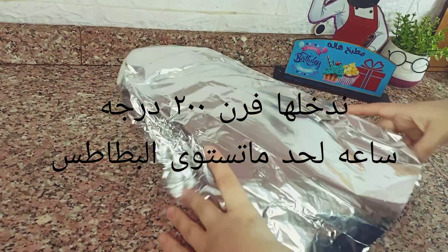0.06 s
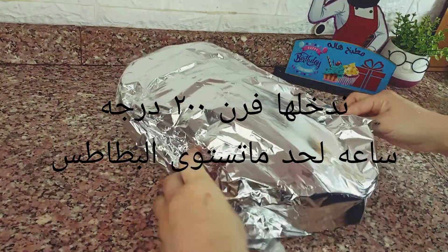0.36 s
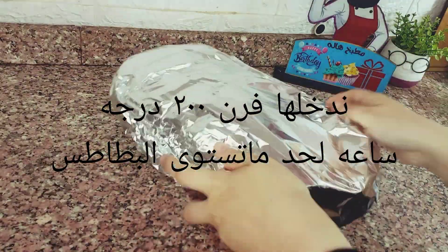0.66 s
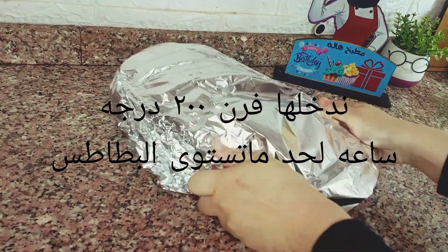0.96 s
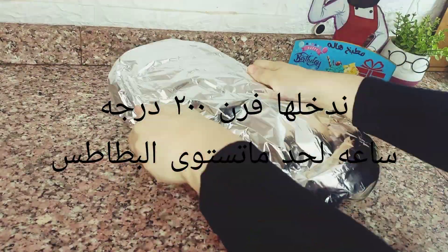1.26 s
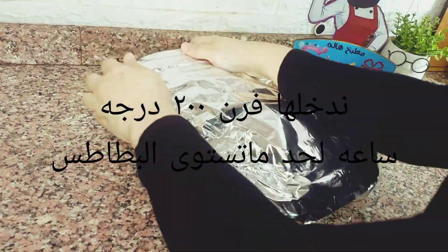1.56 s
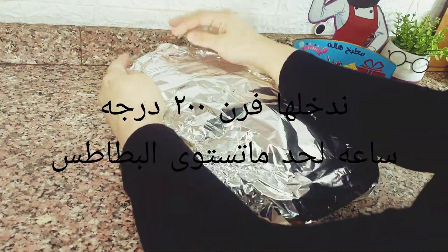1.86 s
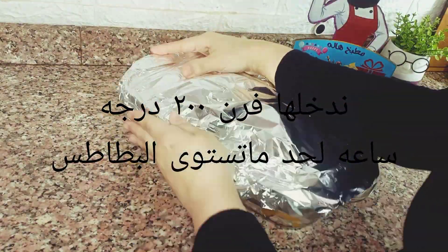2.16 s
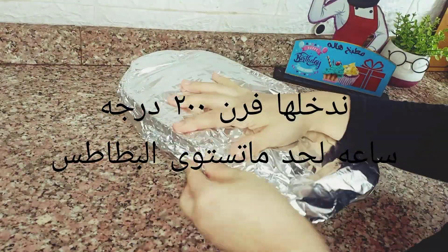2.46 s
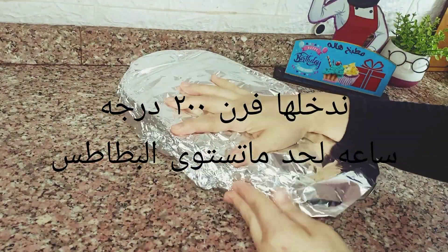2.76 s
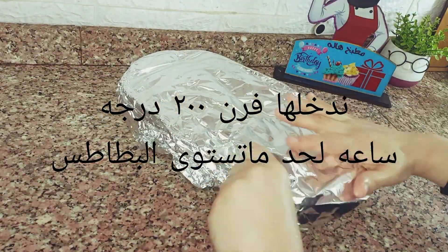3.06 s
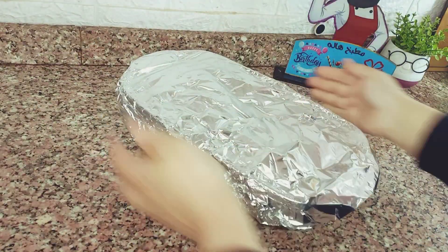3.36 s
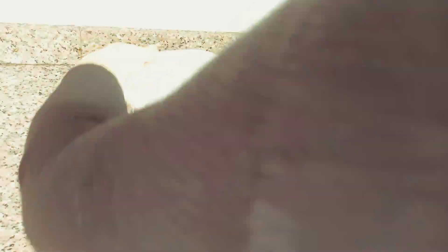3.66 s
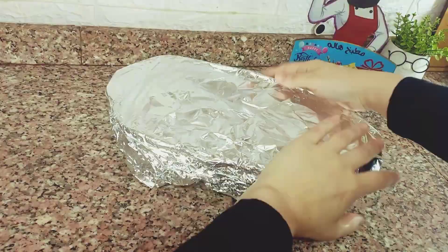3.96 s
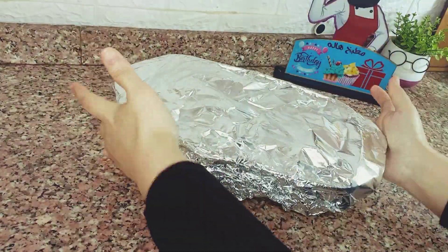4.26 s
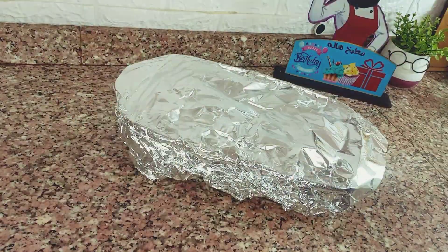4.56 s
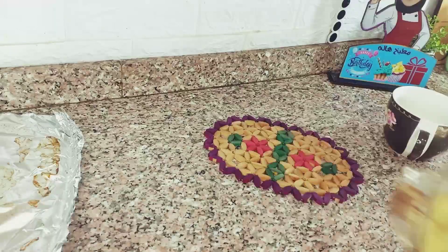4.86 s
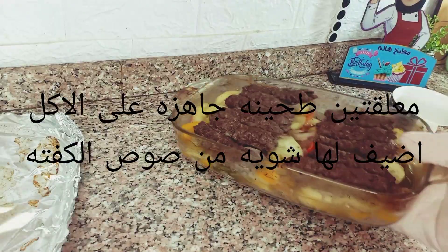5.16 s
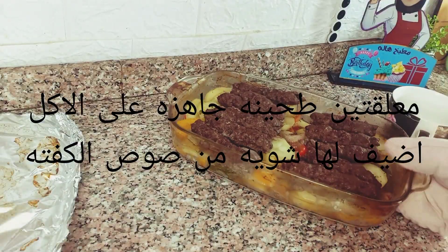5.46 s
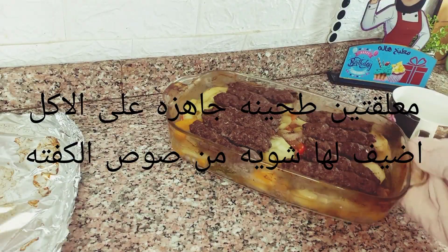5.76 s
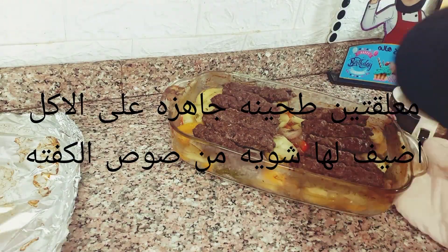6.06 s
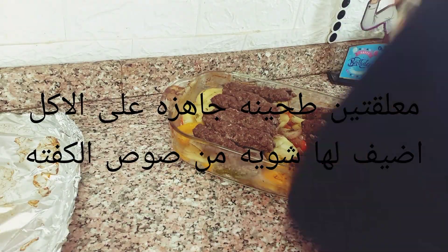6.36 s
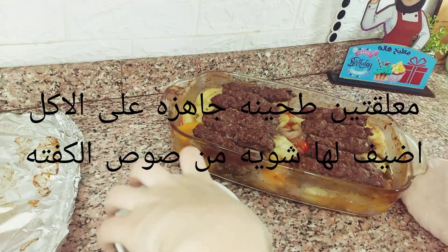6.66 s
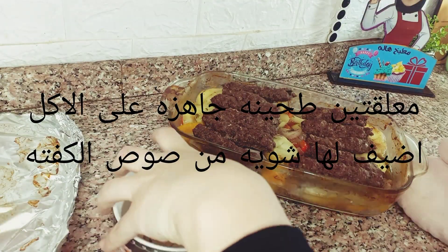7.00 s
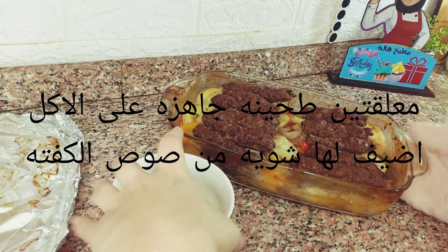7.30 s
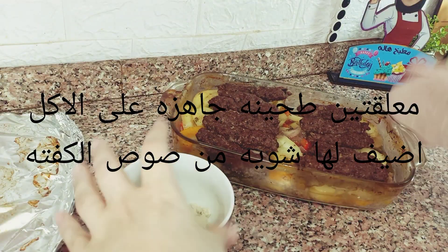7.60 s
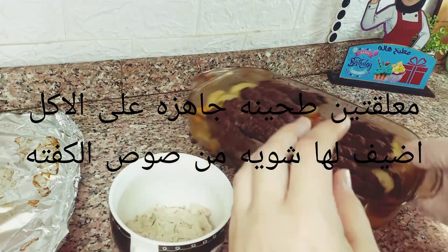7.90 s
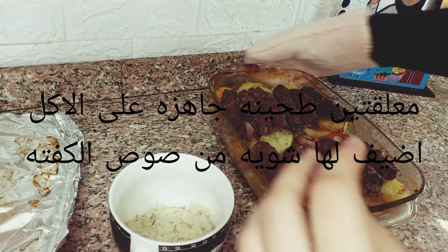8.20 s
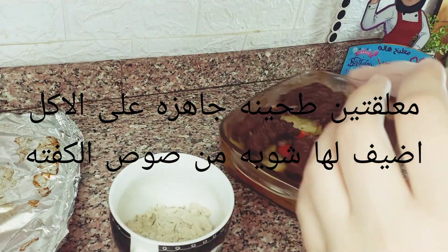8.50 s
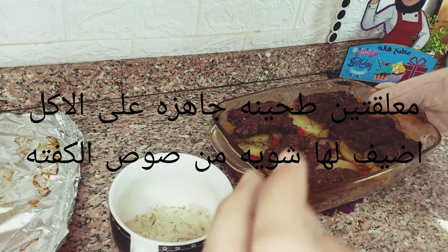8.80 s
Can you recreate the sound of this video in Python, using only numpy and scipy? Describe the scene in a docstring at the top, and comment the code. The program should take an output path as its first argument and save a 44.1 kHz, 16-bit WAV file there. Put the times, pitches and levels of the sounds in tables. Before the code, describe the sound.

Aluminium foil crinkles in short, bright squeezes as hands press it around a baking dish, with little snaps that grow sparser and fainter. After a brief silence, the glass dish lands on a stone counter with a dull knock and settles. A china bowl follows with one bright clack, light taps and faint scrapes. Everything sounds close, in a small, hard-walled kitchen with a quietly humming appliance.

```python
"""Aluminium foil crinkles in short squeezes as two hands press it round a glass baking dish.
Each crinkle is a crowd of tiny buckles that shiver through the sheet. After a brief silence the dish
knocks down on a stone counter and settles, then a china bowl is put beside it and nudged.
The small hard kitchen echoes, and an appliance, probably the fridge, hums behind it all."""
import sys
import numpy as np
from scipy import signal
from scipy.fft import rfft, irfft, next_fast_len
from scipy.io import wavfile
from scipy.ndimage import uniform_filter1d, minimum_filter1d, map_coordinates

SR = 44100
rng = np.random.default_rng(int(sys.argv[2]) if len(sys.argv) > 2 else 0)


def file_out(sig):
    """Save sig as 16-bit WAV at sys.argv[1]."""
    # one column per channel
    cols = np.atleast_2d(sig).T
    # limit, then scale
    lim = np.clip(cols, -1, 1)
    pcm = np.round(lim * 32767).astype(np.int16)
    wavfile.write(sys.argv[1], SR, pcm)


N = 389844


def crinkle(thinning_s=2.4, end_s=4.7, scatter_db=2.0, clump_db=2.1, flex_db=1.5, count=10000):
    """Tiny buckles come in clumps, ever sparser as the loose foil is used up."""
    times = -thinning_s * np.log(1 - rng.uniform(size=count) * (1 - np.exp(-end_s / thinning_s)))
    sizes = amp(scatter_db * np.minimum(rng.exponential(size=count), 3.5))
    sizes *= np.exp(times / thinning_s / 2)  # fewer buckles share the same work
    crackle = sheet(buckles(times, sizes) * amp(clump_db * wobble(110)))
    below = lambda hz, edge: 1 / (1 + (hz / edge) ** 12)
    band = lambda response: unit(filtered(crackle, response)) * np.sqrt(end_s * SR / N)
    # Small creases tick high, flat facets fill the middle, broad panels crackle low.
    creases = band(lambda hz: 1 - below(hz, 2830)) * pressure(body_share=0)
    facets = band(lambda hz: below(hz, 3070) - below(hz, 1150)) * pressure(body_share=0.76)
    panels = band(lambda hz: below(hz, 1500)) * pressure(body_share=1)
    panels *= amp(flex_db * wobble(24.97))
    return amp(-0.5) * creases + amp(-5.5) * facets + amp(-11.5) * panels


# The hands mould the foil to the dish. Each row: start in seconds, end in seconds, level in dB,
# body in dB (how much broad sheet moves, which adds low crackle).
HAND_GRIPS = [(0.03, 0.045, -38, -1.5), (0.074, 0.52, -30.5, -2), (0.541, 0.68, -40, 1.5),
              (0.7, 1.014, -32.5, -0.5), (1.045, 1.064, -33.5, -3.5), (1.167, 1.19, -47.5, 2),
              (1.187, 1.29, -35, 1.5), (1.483, 1.574, -35.5, -1), (1.574, 1.832, -34, 2.5),
              (1.83, 1.891, -41, 1), (1.946, 2.05, -36, 2.5), (2.066, 2.29, -39.5, -0.5),
              (2.375, 2.696, -39.5, -0.5), (2.716, 2.95, -45, -2), (3.023, 3.146, -37, -3.5),
              (3.262, 3.376, -42.5, 0), (3.526, 3.66, -40.5, -1), (3.697, 3.726, -52, 11.5),
              (4.018, 4.107, -46, -4), (4.22, 4.383, -57, 6)]
# A finger crushes a patch. Each row: loudest moment in seconds, length in seconds, level in dB,
# body in dB.
FINGER_CRUSHES = [(0.122, 0.18, -30.5, -4), (0.196, 0.12, -25.5, 0.5), (0.568, .03, -30, 0.5),
                  (0.706, 0.067, -25.5, -2), (0.97, 0.12, -26, -1), (1.097, 0.023, -32.5, 4.5),
                  (1.267, 0.072, -24.5, -3.5), (1.365, 0.052, -31.5, 3.5), (2.088, 0.053, -32.5, 2.5),
                  (2.195, 0.038, -25.5, 2.5), (2.238, 0.022, -24, -2.5), (2.421, 0.059, -30, 3),
                  (2.51, 0.11, -30.5, -1), (2.747, 0.043, -28.5, 1), (2.87, 0.041, -30.5, 1.5),
                  (3.235, 0.046, -42.5, 1), (3.268, 0.03, -31, -17), (3.381, 0.022, -37.5, 1),
                  (3.798, 0.058, -36.5, 2), (4.043, 0.074, -43.5, 0), (4.355, 0.035, -50.5, 5)]


def pressure(body_share, close_s=0.016, sag_db_per_s=2, release_db_per_s=442, crush_edge_db=11.5):
    """How hard the foil is worked: a grip closes, sags and lets go; a crush swells and fades."""
    t, power = clock(), np.zeros(N)
    for start, end, db, body_db in HAND_GRIPS:
        near = slice(int(max(start - close_s, 0) * SR), int((end + .25) * SR))
        age, since_end = t[near] - start, np.maximum(t[near] - end, 0)
        closing = np.clip(age / close_s + .5, 0, 1)
        drop_db = sag_db_per_s * age + release_db_per_s * since_end  # moulded foil gives less
        power[near] += (closing * amp(db + body_share * body_db - drop_db)) ** 2
    for crest, length, db, body_db in FINGER_CRUSHES:
        near = slice(int(max(crest - 2 * length, 0) * SR), int((crest + 2 * length) * SR))
        drop_db = crush_edge_db * np.abs(t[near] - crest) / (length / 2)
        power[near] += amp(db + body_share * body_db - drop_db) ** 2
    return np.sqrt(power)


# Folds that give way all at once. Each row: start in seconds, relative level in dB.
FOLD_SNAPS = [(0.024, -24), (0.103, -20.5), (0.354, -20), (0.400, -18.5), (0.703, -29.5), (0.98, -26),
              (1.017, -21), (1.092, -23), (1.489, -21.5), (1.583, -19.5), (1.642, -17.5), (1.773, -20),
              (1.941, -26), (2.068, -23), (2.164, -16.5), (2.187, -20), (2.377, -27), (2.587, -22.5),
              (2.655, -21.5), (2.794, -19.5), (2.845, -22.5), (2.886, -18.5), (2.914, -23.5),
              (2.930, -21.5), (2.986, -30), (3.026, -24.5), (3.169, -29), (3.257, -23.5), (3.347, -24.5),
              (3.382, -27.5), (3.526, -33.5), (3.611, -23), (3.652, -25.5), (3.672, -24), (3.728, -29.5),
              (3.792, -23)]


def snaps(run_s=0.003, scatter_db=3, boost_db=27, count=16):
    """A fold gives way in a quick run of buckles that weaken as it goes."""
    start, db = np.transpose(FOLD_SNAPS)[:2, :, None]
    delay = rng.exponential(size=(len(start), count))
    sizes = amp(scatter_db * rng.standard_normal(delay.shape)) * np.exp(-delay / 4)
    sizes *= amp(db + boost_db) / np.linalg.norm(sizes, axis=1, keepdims=True)
    clicks = buckles((start + run_s * delay).ravel(), sizes.ravel())
    return sheet(clicks, snap_t60=0.011, ring_t60=0.12, ring_db=-11.5, shapes=150)


def buckles(times, sizes, spread_s=.00012, lean_db=3):
    """Each buckle clicks from its own spot, so it reaches the two ears at its own time and level."""
    lag, lean, flip = rng.standard_normal((len(times), 3)).T
    ears = []
    for side in (0.93, -1):
        arrival = np.clip((times + side * spread_s * lag) * SR, 0, N - 1).astype(int)
        heights = np.sign(flip) * sizes * amp(side * lean_db * lean / 2)
        ears.append(np.bincount(arrival, heights, N))
    return np.array(ears)


# The tone of the foil. Each row: frequency in Hz, relative level in dB.
FOIL_TONE = [(30, -63), (90, -22.5), (200, -20), (300, -18.5), (730, -5), (1050, -12), (1400, -11),
             (2250, -1.5), (3700, -8), (5000, 0), (7500, -12.5), (9700, -18.5), (13600, -8.5), (15800, -19)]
# Which side the foil is louder on. Each row: frequency in Hz, left minus right in dB.
FOIL_BALANCE = [(60, -8), (110, 6), (200, -4.5), (380, 0), (700, -1), (1290, 0), (2380, -1), (4400, -2),
                (8120, 3), (15000, -1.0)]


def sheet(clicks, snap_t60=0.021, ring_t60=0.14, ring_db=-10, shapes=170):
    """Each click becomes a short burst that shivers on through a sheet that keeps changing shape."""
    out, grain = np.zeros((2, N)), stereo_noise(N)
    for part in np.array_split(np.arange(N), shapes):
        if not clicks[:, part].any():
            continue
        t = np.arange(len(part)) / SR
        burst = grain[:, part] * (fade(t, snap_t60) + amp(ring_db) * fade(t, ring_t60))
        burst /= np.linalg.norm(burst)
        add(out, part[0] / SR, signal.fftconvolve(clicks[:, part], burst, axes=1))
    return filtered(out, lambda hz: amp(along(FOIL_TONE, hz)) * pan(-along(FOIL_BALANCE, hz)))


# The dish meets the counter. Each row: start in seconds, level in dB, brightness in Hz.
DISH_HITS = [(5.120, -11.5, 956), (5.386, -31, 500), (5.394, -18, 325), (5.404, -19, 754),
             (5.510, -45, 400), (5.812, -41, 250), (8.425, -49.5, 199), (8.475, -49, 500)]
# The tone of its knock. Each row: frequency in Hz, relative level in dB.
DISH_TONE = [(25, -46), (60, -30), (135, -1), (420, 0), (900, 5.5), (1200, 2.5), (1550, -9), (2700, 1),
             (3500, -21.5), (5000, -2), (9700, -25.5), (14000, -20)]
# The notes it rings with. Each row: pitch in Hz, relative level in dB, seconds to fade by 60 dB.
DISH_NOTES = [(150, -6, .12), (400, 10, 0.06), (524, -3, 0.17), (645, 4, 0.13), (670, 4, 0.12),
              (752, 2, 0.17), (770, -2, 0.19), (890, -1, 0.15), (1180, -10, 0.16), (1143, 1, 0.18),
              (2120, -7, 0.17)]


def glass_dish():
    """The glass dish lands on the stone with a dull knock and settles."""
    return knocks(DISH_HITS, DISH_TONE, DISH_NOTES, crack_t60=0.031, clatter_t60=0.17,
                  clatter_db=-13.5, thump_hz=308, thump_db=1.5, ring_db=-7.5)


# The bowl meets the counter. Each row: start in seconds, level in dB, brightness in Hz.
BOWL_HITS = [(6.120, -40, 1830), (6.538, -12, 3700), (6.548, -34.5, 2000), (6.577, -31, 1970),
             (6.647, -29, 2290), (6.654, -32.5, 1200), (7.556, -49, 650)]
# The tone of its knock. Each row: frequency in Hz, relative level in dB.
BOWL_TONE = [(40, -38), (150, -22), (500, -12), (850, -0.5), (1500, -2.5), (2200, 1), (2750, -4),
             (3300, -18.5), (5500, -19.5), (7200, -39), (10000, -47), (14000, -23)]
# The notes it rings with. Each row: pitch in Hz, relative level in dB, seconds to fade by 60 dB.
BOWL_NOTES = [(827, -30, .25), (920, -3, .3), (1066, -17, .3), (1210, -9, .2), (1460, -44, .2),
              (1570, 24, 0.057), (2060, -4, 0.14), (2590, -18, .2), (2890, -11, .16)]


def china_bowl():
    """The china bowl meets the stone with one bright clack and several light taps."""
    return knocks(BOWL_HITS, BOWL_TONE, BOWL_NOTES, crack_t60=0.03, clatter_t60=0.08,
                  clatter_db=-18, thump_hz=350, thump_db=2.5, ring_db=-14.5)


def knocks(hits, tone, notes, crack_t60, clatter_t60, clatter_db, thump_hz, thump_db, ring_db):
    """A low thump, a crack trailing into clatter, and a faint ring; a softer contact cuts the treble."""
    out, t = np.zeros((2, N)), np.arange(SR // 2) / SR
    unit_energy = lambda x: x / np.sqrt(np.sum(x ** 2) / 2)
    low_pass = lambda f, edge: 1 / np.hypot(1, (f / edge) ** 2)
    bass_cut = lambda f: f ** 2 / (f ** 2 + 110 ** 2)  # the ringing notes carry no deep bass
    hz, note_db, t60 = np.transpose(notes)[:, :, None]
    thump = amp(thump_db) * struck(np.array([t == 0], float), lambda f: low_pass(f, thump_hz))
    crack_fade = fade(t, crack_t60) + amp(clatter_db) * fade(t, clatter_t60)
    for start, db, bright_hz in hits:
        crack = unit_energy(stereo_noise(len(t)) * crack_fade)
        crack = struck(crack, lambda f: f / np.hypot(f, thump_hz))
        blow = unit_energy(struck(thump + crack, lambda f: amp(along(tone, f)) * low_pass(f, bright_hz)))
        waves = amp(note_db) * low_pass(hz, bright_hz) * fade(t, t60) * np.sin(2 * np.pi * hz * t)
        ring = amp(rng.normal(0, 2.5, (2, len(hz)))) @ waves  # each ear gets its own mix of notes
        ring = unit_energy(struck(ring, bass_cut))
        add(out, start, amp(db) * np.sqrt(SR / 60) * (blow + amp(ring_db) * ring))
    return out


# Short scrapes. Each row: start in seconds, length in seconds, level in dB, middle pitch in Hz,
# width in octaves.
SCRAPES = [(3.597, 0.077, -42.5, 1400, 0.39), (4.617, 0.087, -52.5, 2400, 0.43),
           (4.876, 0.038, -47, 1960, 0.7), (5.048, 0.068, -51, 3000, 0.65), (5.384, .033, -37, 1600, 0.79),
           (6.603, 0.046, -37, 1570, 0.51), (6.67, 0.15, -46.5, 1030, 0.71),
           (7.08, 0.065, -43.5, 1670, 0.39), (7.522, 0.077, -52.5, 2370, 0.86),
           (7.755, 0.31, -53.5, 2750, 0.75), (8.296, 0.39, -60, 3000, 0.76)]


def scrapes(grit_db=3):
    """Hands and crockery rub over foil and stone: a gritty hiss that swells and fades."""
    out, grit = np.zeros((2, N)), amp(grit_db * wobble(190))
    for start, length, db, centre_hz, octaves in SCRAPES:
        n = int(length * SR)
        rub = filtered(stereo_noise(n), lambda hz: bell(np.log2((hz + 1) / centre_hz), octaves))
        add(out, start, amp(db) * unit(rub) * np.sin(np.pi * np.arange(n) / n))
    return out * grit


# How long the kitchen echoes. Each row: frequency in Hz, seconds to fade by 60 dB.
ECHO_TIMES = [(150, 0.23), (900, 0.29), (2500, 0.14), (6000, 0.17), (14000, 0.072)]


def kitchen_echo(x, stretches=14):
    """The hard walls return a wash of sound that changes as hands and things move."""
    out = np.zeros((2, N))
    for part in np.array_split(np.arange(N), stretches):
        hz, t, bands = signal.stft(stereo_noise(SR // 3), SR, nperseg=256)
        tail = signal.istft(bands * fade(t, along(ECHO_TIMES, hz)[:, None]), SR, nperseg=256)[1]
        tail /= np.linalg.norm(tail[0])
        add(out, part[0] / SR, signal.fftconvolve(x[:, part], tail, axes=1))
    return out


# Room noise before and after the silence. Each row: frequency in Hz, relative level in dB.
RUSH_BEFORE = [(15, -68), (25, -27), (70, -7.5), (102, 1.5), (211, -6), (283, -10), (352, -4.5),
               (402, -3.5), (833, -5.5), (980, -9.5), (1390, -13.5), (2660, -8), (8480, -27.5),
               (13400, -32.5), (15800, -34)]
RUSH_AFTER = [(25, -26), (60, -19), (85, -8.5), (140, -6.5), (240, -14.5), (360, -7.5), (650, -9),
              (1250, -18), (2200, -16), (3500, -25.5), (4900, -22.5), (7600, -38.5), (9800, -44.5),
              (13500, -34), (15800, -52)]
# The appliance's tones before and after it. Each row: pitch in Hz, relative level in dB.
WHINE_BEFORE = [(97, -72.5), (400, -69), (2261, -69), (2654, -63.5), (2900, -79), (3644, -67), (4250, -70),
                (4930, -65)]
WHINE_AFTER = [(146, -70.5), (485, -68), (1877, -75), (2196, -73.5), (2811, -72.5), (4899, -73)]


def background(hum_hz=100, hum_db=-54):
    """The scene breaks off in a moment of silence; a different room noise follows, now with a mains hum."""
    t = clock()
    hum_level = amp(hum_db + 0.35 * wobble(2.9)) * np.sqrt(2)
    hum = hum_level * np.sin(2 * np.pi * hum_hz * t + .15 * wobble(4.6))
    before = room_noise(RUSH_BEFORE, WHINE_BEFORE, rush_db=-52, whine_boost_db=2.0, fuzz=0.0092)
    after = room_noise(RUSH_AFTER, WHINE_AFTER, rush_db=-49, whine_boost_db=3.5, fuzz=0.0058) + hum
    return before * np.interp(t, [4.726, 4.732], [1, 0]) + after * np.interp(t, [4.79, 4.87], [0, 1])


def room_noise(spectrum, tones, rush_db, whine_boost_db, fuzz):
    """A steady rush with an appliance's whine; fuzz is each tone's width as a share of its pitch."""
    rush = unit(filtered(stereo_noise(N), lambda hz: amp(along(spectrum, hz))))
    peak = lambda hz, pitch: bell(hz - pitch, fuzz * pitch) / (fuzz * pitch * np.sqrt(2 * np.pi))
    power = lambda hz: sum(amp(db) ** 2 * peak(hz, pitch) for pitch, db in tones)
    whine = filtered(stereo_noise(N), lambda hz: np.sqrt(power(hz) * SR / 2))
    return amp(rush_db) * rush + amp(whine_boost_db) * whine


# How alike left and right sound. Each row: frequency in Hz, likeness from 0 (unrelated) to 1 (same).
EAR_LIKENESS = [(60, 1), (180, 0.92), (550, 0.58), (1650, 0.018), (4970, 0.02), (15000, 0.01)]


def stereo_noise(n):
    """Noise from all around: left and right are alike in the bass and unrelated in the treble."""
    angle = lambda hz: np.arccos(np.clip(along(EAR_LIKENESS, hz), 0, 1)) / 2
    shares = lambda hz: np.array([np.cos(angle(hz)), np.sin(angle(hz))])
    mid, side = filtered(rng.standard_normal((2, n)), shares)
    return np.array([mid + side, mid - side])


def amp(db):
    """Turn dB into a number to multiply by."""
    return 10 ** (np.asarray(db) / 20)


def fade(t, t60):
    """Die away by 60 dB every t60 seconds."""
    return amp(-60 * t / t60)


def bell(distance, width):
    """A smooth hump, highest at distance zero."""
    return np.exp(-(distance / width) ** 2 / 2)


def pan(right_db):
    """Left and right gains, with the right louder by right_db."""
    return amp(right_db * np.array([[-.5], [.5]]))


def unit(x):
    """Scale to an average power of one."""
    return x / np.sqrt(np.mean(x ** 2) + 1e-20)


def clock():
    """The time of every sample in seconds."""
    return np.arange(N) / SR


def along(points, hz):
    """Read between (Hz, value) rows on a scale of octaves."""
    f, v = np.transpose(points)
    return np.interp(np.log(hz + 1), np.log(f + 1), v)


def wobble(rate):
    """A smooth curve through rate random points a second."""
    return map_coordinates(rng.standard_normal(int(N * rate / SR) + 4), [clock() * rate])


def filtered(x, response):
    """Turn each frequency of x up or down by response(hz)."""
    n = x.shape[-1]
    m = next_fast_len(n + SR // 4)
    return irfft(rfft(x, m) * response(np.fft.rfftfreq(m, 1 / SR)), m)[..., :n]


def struck(x, response, size=8192):
    """Filter x so that nothing sounds before the blow."""
    cepstrum = irfft(np.log(response(np.fft.rfftfreq(size, 1 / SR)) + 1e-6))
    cepstrum[1:size // 2] *= 2  # move the filter's early half over to its late half
    cepstrum[size // 2 + 1:] = 0
    impulse = irfft(np.exp(rfft(cepstrum)))
    return signal.fftconvolve(x, impulse[None], axes=1)[:, :x.shape[1]]


def add(track, s, sound):
    """Mix a stereo sound in at s seconds."""
    start = max(round(s * SR), 0)
    track[:, start:start + sound.shape[1]] += sound[:, :N - start]


def scene():
    """Foil, dish and bowl share one room and lean a little to either side."""
    foil = crinkle() + snaps()
    dish, bowl = glass_dish(), china_bowl()
    room = kitchen_echo(amp(-22.5) * foil + amp(-25.5) * dish + amp(-10) * bowl)
    return (foil + dish + room) * pan(1.0) + bowl * pan(-0.67) + (scrapes() + background()) * pan(1.96)


def record(dry, ceiling=.85, top_hz=15830):
    """A limiter briefly turns down the hardest knocks, and the highest treble is cut off."""
    needed = np.minimum(1, ceiling / (np.abs(dry).max(axis=0) + 1e-9))
    gain = uniform_filter1d(minimum_filter1d(needed, size=181), size=181)
    return filtered(dry * gain, lambda hz: hz < top_hz)


dry = scene()
out = record(dry)
file_out(out)
```